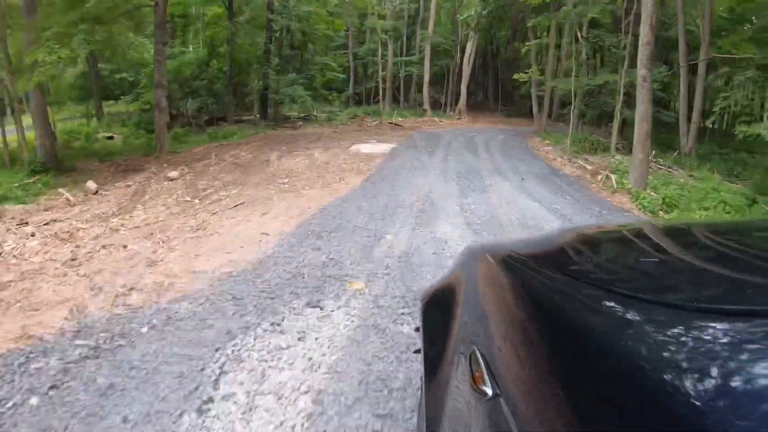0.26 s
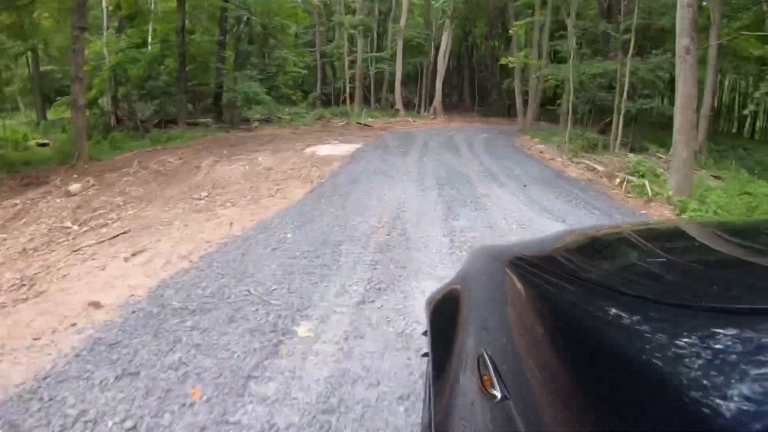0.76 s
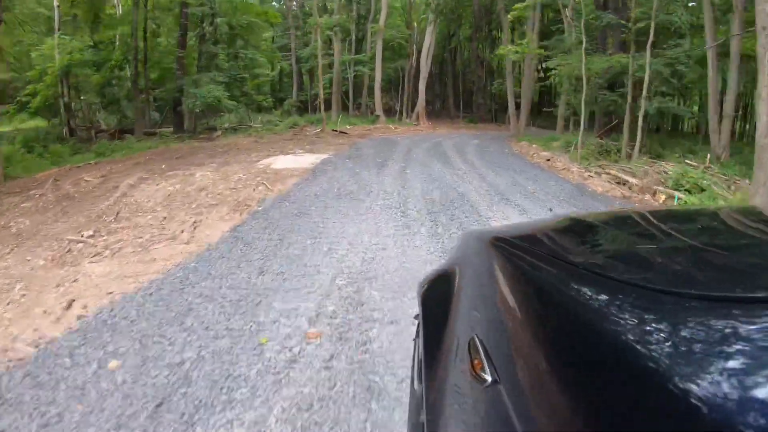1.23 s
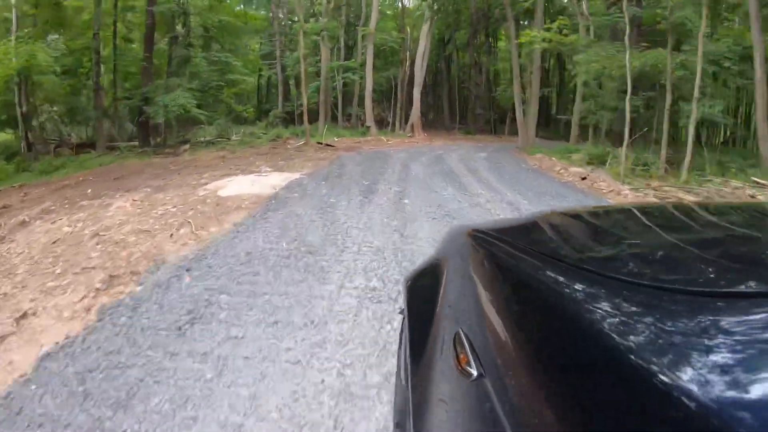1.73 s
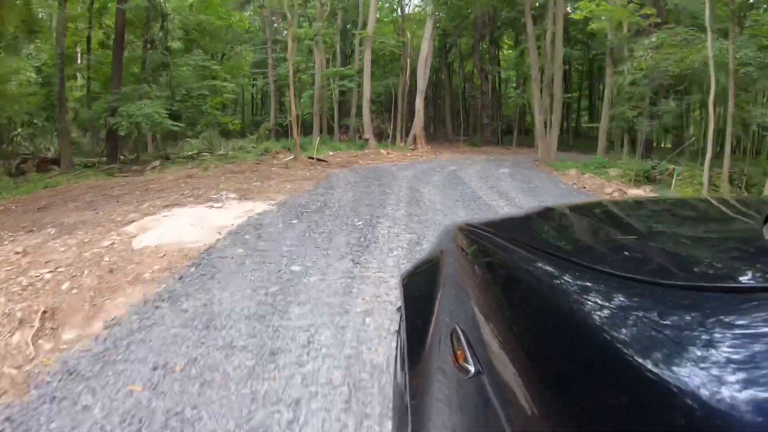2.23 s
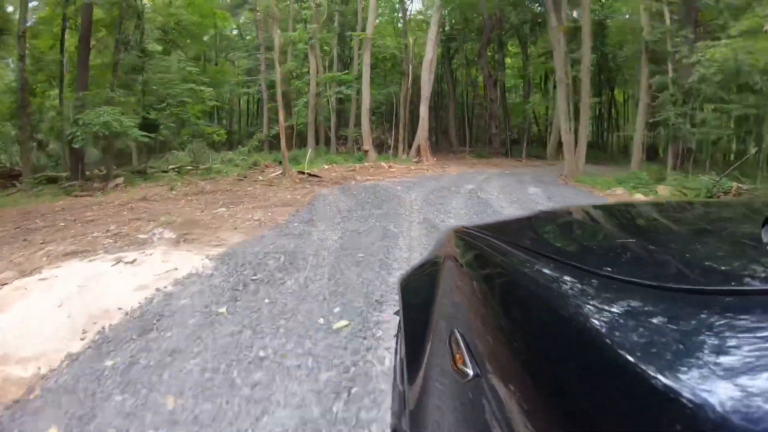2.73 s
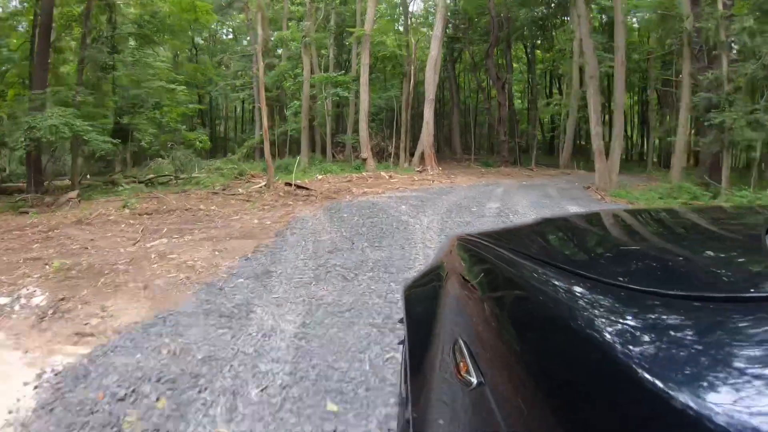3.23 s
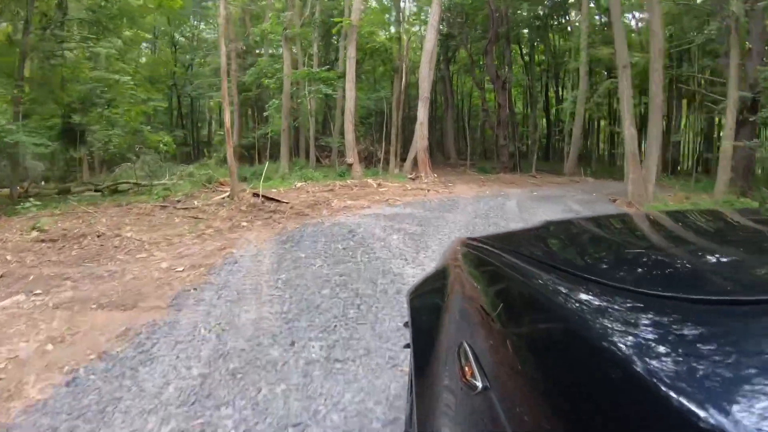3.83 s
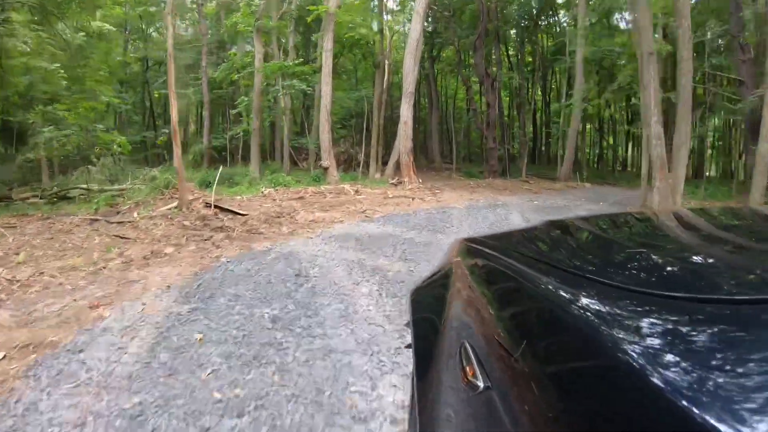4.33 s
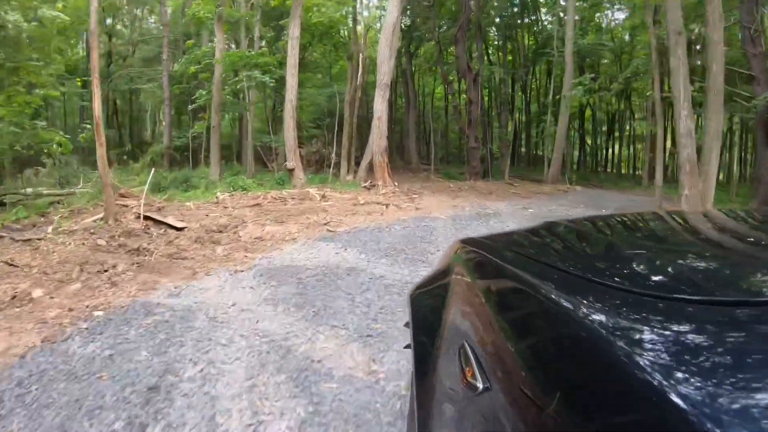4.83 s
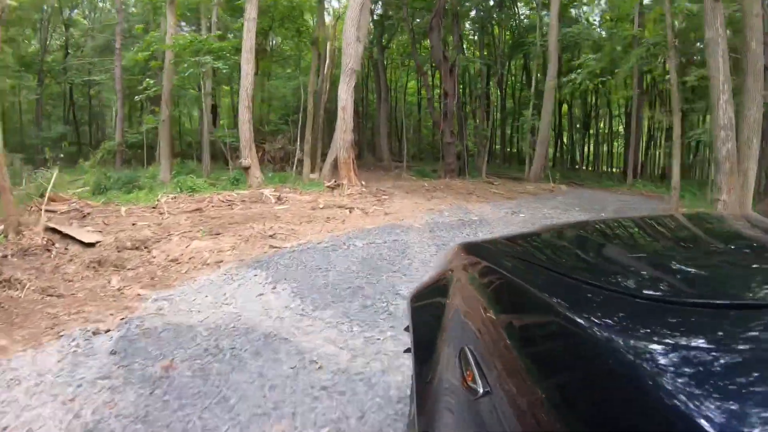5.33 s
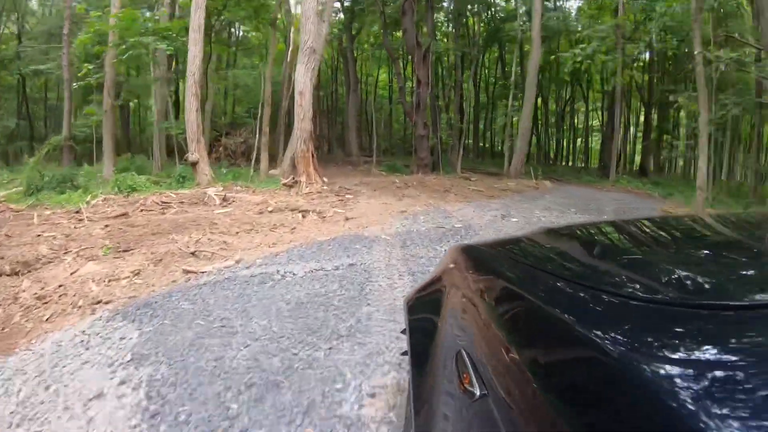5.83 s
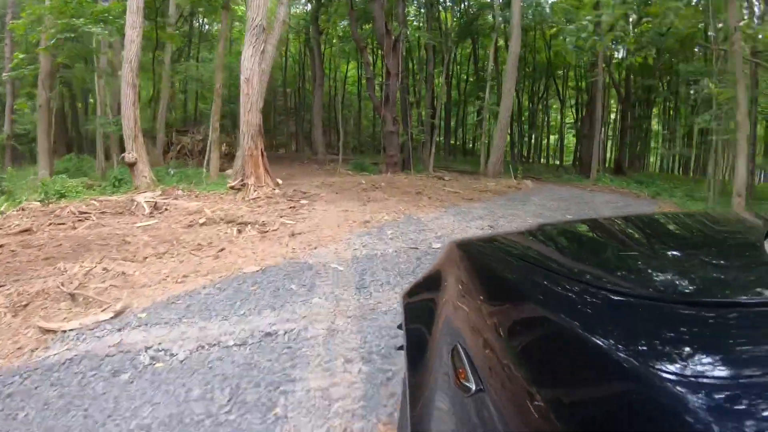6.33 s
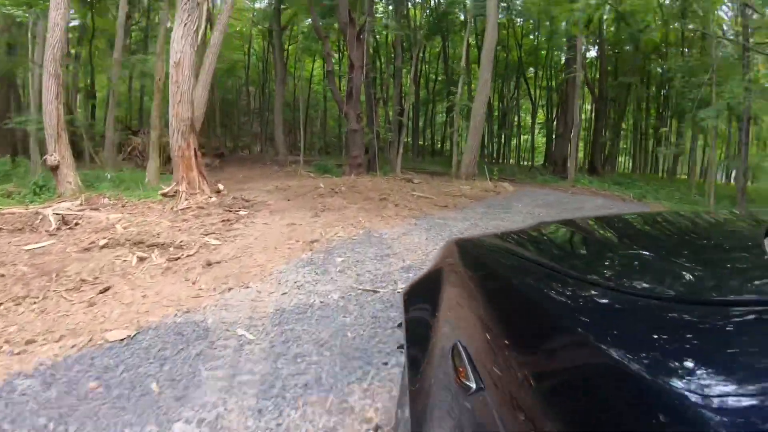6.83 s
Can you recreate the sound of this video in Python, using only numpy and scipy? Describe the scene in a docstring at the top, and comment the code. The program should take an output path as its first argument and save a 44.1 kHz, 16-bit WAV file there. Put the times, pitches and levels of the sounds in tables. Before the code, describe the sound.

A car rolls slowly over loose gravel, tyres crunching and popping stones beneath a low engine hum, with early wind buffeting on the left.

```python
"""Loose gravel under a slowly rolling car tyre: stones grind, pop and fly up into the wheel arch.
The two-port camera microphone is held outside the driver's window, with the tyre to its right.
The engine hums, pulls and eases off; at first the airstream buffets the left port.
Stones are filtered noise bursts, the engine is a sum of cosines, wind and rumble are shaped noise.
"""
import sys
import numpy as np
from scipy import signal
from scipy.fft import rfft, irfft, next_fast_len
from scipy.io import wavfile
from scipy.ndimage import map_coordinates

SR = 44100
rng = np.random.default_rng(int(sys.argv[2]) if len(sys.argv) > 2 else 0)


def master_out(mix):
    """Clip the mix to full scale and print it as 16-bit PCM to the path in sys.argv[1]."""
    frames = np.transpose(np.atleast_2d(mix))
    ceiling = np.clip(frames, -1, 1)
    pcm = np.round(ceiling * 32767).astype(np.int16)
    wavfile.write(sys.argv[1], SR, pcm)


N = 311919  # length in samples

# All levels below stand ahead of each layer's own trim; spectra give only relative levels.

# pull and easing of the engine: time_s, firing_rate_hz
FIRING_RATE = [(0.0, 56.2), (0.3, 60.16), (0.71, 67.1), (1.2, 73.06), (1.69, 76.72), (2.28, 74.45),
               (2.65, 67), (3.05, 62.46), (3.5, 59.7), (3.8, 59.16), (4.05, 60.6), (4.3, 60.18),
               (4.84, 55.7), (5.28, 52.83), (5.72, 51.4), (6.16, 50.14), (6.65, 49.55), (7.07, 47.9)]
# what the exhaust passes of the firing tone and its overtones: pitch_hz, level_db
EXHAUST_RESPONSE = [(48, -27.3), (51, -26.5), (53, -24.3), (57, -20.3), (61, -19), (67, -21.3), (72, -21),
                    (76, -20), (96, -21.5), (100, -23), (105, -25), (118, -30.5), (124, -30.5), (135, -36),
                    (147, -34.5), (160, -36), (185, -39), (208, -40.5), (225, -47), (245, -56), (310, -62)]
# half orders from unequal cylinders: pitch_hz, level_db
HALF_ORDER_RESPONSE = [(25, -45), (30, -38), (38, -45), (74, -32.5), (80, -33), (86, -36.5), (95, -34),
                       (115, -37), (125, -47), (150, -45), (178, -51), (200, -44), (211, -41), (230, -51),
                       (270, -56)]
# overtones are weaker while the engine pulls, until it eases off between two times
OVERTONE_LOAD_DB, EASING_S = -4, (2.3, 3.0)

# roughness of the track: time_s, rumble_db
TRACK_ROUGHNESS = [(0, -31.5), (1.3, -32), (2.2, -27.5), (2.8, -29.5), (3.5, -33), (5, -33.5), (5.7, -31.5),
                   (6.2, -36.5), (7.07, -41.5)]
# rumble spectrum: frequency_hz, level_db_per_hz
RUMBLE_SPECTRUM = [(10, -30), (18, -4), (26, 8), (32, 10.5), (42, 4), (70, -1.5), (110, -2.5), (150, -8),
                   (190, -13.5), (245, -11.5), (350, -17), (800, -60), (3000, -110)]
# ruts crossed by the tyres: centre_s, level_db, length_s
RUT_CROSSINGS = [(.2, -29, 0.27), (.75, -26, 0.37), (1.15, -29, 0.28), (2.42, -26, .18), (2.72, -29, 0.24)]
# boom of the tyres in the ruts: frequency_hz, level_db_per_hz
TYRE_BOOM_SPECTRUM = [(30, -30), (55, -6), (90, 0), (115, -3), (160, -15), (400, -50), (2000, -110)]

# looseness of the coarse stones under the tread: time_s, crunch_db
COARSE_STONES = [(0, -39.5), (.43, -36), (.7, -38.5), (2.1, -39.5), (3.0, -43.5), (3.9, -43.5), (4.5, -39),
                 (5.1, -42), (5.8, -40.5), (6.2, -42.5), (7.07, -41)]
# patches of fine grit on the track: time_s, hiss_db
GRIT_PATCHES = [(0, -54.5), (.25, -53.5), (.4, -48.5), (.7, -54), (.97, -51), (1.25, -54.5), (2.1, -51.5),
                (3.4, -52), (3.72, -48.5), (4.1, -52.5), (4.5, -51), (5.4, -54.5), (7.07, -52.5)]
# spectra of coarse stones and of fine grit: frequency_hz, level_db_per_hz
CRUNCH_SPECTRUM = [(100, -6.5), (200, 9), (320, 3), (470, 0), (640, -5), (760, -4), (900, -7), (1400, -10),
                   (2000, -14.5), (2600, -20), (5000, -27), (12000, -59)]
GRIT_SPECTRUM = [(600, 0.5), (1700, 14), (2500, 1), (3300, 3.5), (4200, -2), (5250, 3), (5900, -0.5),
                 (6750, 4), (7400, -2), (9300, -6), (10500, -17), (12000, -24), (15000, -30)]

# drumming of the wheel well: time_s, level_db
DRUMMING_LEVEL = [(0, -42), (1.5, -37), (2, -31), (3.7, -35), (5.7, -40.5), (6.2, -32.5), (6.6, -39),
                  (7.07, -41)]
# hollow resonances of the wheel well: pitch_hz, width_hz, level_db
WELL_MODES = [(478, 120, -3), (624, 45, 3), (708, 99, -2)]

# airstream, leaving the left port as the car turns: time_s, level_db
AIRSTREAM_LEVEL = [(0, -28.5), (.28, -23.5), (.5, -22), (.78, -22.5), (1.0, -24), (1.15, -24.5),
                   (1.22, -33), (1.6, -25), (2.05, -34.5), (2.5, -31.5), (3, -41.5), (7.07, -68)]
# strongest puffs: centre_s, level_db, length_s
STRONG_PUFFS = [(.06, -13.5, .085), (.235, -15, .08), (.86, -21, .05), (1.13, -17.5, .06),
                (1.418, -27, .05), (1.597, -17.5, .04), (1.933, -22, .025), (2.033, -21, .025),
                (2.456, -22, .038)]
# buffeting spectrum: frequency_hz, level_db_per_hz
BUFFET_SPECTRUM = [(20, -18), (70, -2), (130, 3), (195, 4.5), (300, -1), (450, -4.5), (700, -8),
                   (1100, -19), (2000, -35), (5000, -57)]
# what the sheltered right port gets of the left port's wind: frequency_hz, level_db
LEE_RESPONSE = [(100, -24), (250, -14), (400, -10), (600, -6), (900, -2), (1300, 2), (2500, 2)]
LEE_PHASE_RAD = 2.7
PUFFS_PER_S, PUFF_DB = 10, 0.5  # pace and depth of the airstream's lesser puffs

# larger stones popping out from under the tread: start_s, level_db, rattle_t60_s, pitch_hz
LARGE_POPS = [(.247, -24, .05, 1500), (.266, -19, .035, 1000), (.305, -23, .03, 850),
              (.34, -19.5, .045, 1500), (.465, -18.5, .04, 750), (.518, -22.5, .03, 650),
              (.571, -21.5, .03, 650), (.701, -16.5, .04, 1050), (.82, -22, .037, 1200),
              (.87, -24, .03, 650), (.915, -24, .03, 700), (1.122, -22, .03, 620), (1.26, -20, .045, 1100),
              (1.568, -22.5, .03, 900), (1.69, -22, .035, 1300), (1.837, -22.5, .03, 750),
              (1.917, -22, .022, 650), (1.983, -17, .03, 624), (1.998, -19, .021, 600),
              (2.01, -15.5, .035, 756), (2.069, -20.5, .022, 640), (2.121, -16.5, .028, 900),
              (2.229, -24, .03, 800), (2.29, -24.5, .03, 580), (2.337, -19, .03, 1300),
              (2.351, -23, .03, 550), (2.38, -19.5, .035, 500), (2.581, -20.5, .033, 500),
              (2.662, -22, .05, 1250), (2.734, -17.5, .04, 1050), (2.759, -23, .025, 600),
              (2.918, -24, .03, 600), (3.015, -22, .024, 553), (3.205, -19.5, .024, 800),
              (3.285, -23, .025, 600), (3.354, -23, .03, 750), (3.526, -22.5, .035, 1000),
              (3.639, -19, .035, 700), (3.801, -24, .03, 1000), (4.022, -22.5, .03, 800),
              (4.313, -22, .045, 1200), (4.429, -19, .032, 1150), (4.501, -23, .03, 650),
              (4.556, -22, .07, 1150), (4.653, -19, .045, 850), (4.693, -20.5, .03, 950),
              (4.893, -23.5, .034, 750), (5.028, -20.5, .032, 1100), (5.075, -24.5, .03, 650),
              (5.12, -25, .045, 1400), (5.332, -25, .027, 650), (5.478, -22.5, .035, 850),
              (6.084, -20, .05, 906), (6.179, -17, .025, 720), (6.1995, -8.5, .028, 860),
              (6.266, -16.5, .024, 780), (6.364, -23, .05, 1150), (6.405, -25, .03, 650),
              (6.477, -21, .028, 1000), (6.508, -22, .04, 1400), (6.723, -23.5, .03, 900),
              (6.912, -20, .03, 950), (6.918, -15.5, .045, 680), (6.959, -24.5, .025, 1500),
              (6.995, -23, .025, 1450)]
# pop spectrum: frequency_hz, level_db_per_hz
POP_SPECTRUM = [(120, -5), (300, -7), (500, -2), (720, 2), (950, -2), (1350, -4), (2000, -8), (4000, -19),
                (8000, -22), (12000, -39)]
# brief ring of the tyre when a stone pops: pitch_hz, width_hz, level_db
TYRE_RING = [(624, 110, 1.5)]
# lesser stones pop at random
SMALL_POPS_PER_S, SMALL_POP_DB, SMALL_POP_SPREAD_DB, SMALL_POP_T60_S = 10, -31, 1.5, 0.02
SMALL_POP_HZ, SMALL_POP_OCTAVES = 1070, 0.48  # middle pitch and its spread
# a larger stone jostles its neighbours: range of delays, level relative to it
JOSTLE_S, JOSTLE_DB = (.008, .03), -12

# stones flung against the wheel arch, with ricochets: start_s, level_db, rattle_t60_s, brightest_hz
ARCH_STRIKES = [(.408, -19, 0.06, 2500), (.413, -21.5, 0.078, 7000), (0.421, -29, 0.057, 1500),
                (0.4232, -23.5, 0.047, 1720), (0.43, -29, 0.035, 1100), (.436, -32, 0.055, 1400),
                (.458, -33.5, 0.16, 5000), (.593, -15.5, 0.036, 4300), (.596, -21, 0.045, 2050),
                (0.6044, -30, 0.052, 3500), (.612, -29.5, 0.037, 2200), (0.935, -35, 0.072, 5476),
                (.976, -34, 0.019, 7000), (0.999, -29, 0.028, 6500), (1.009, -27, 0.014, 8000),
                (1.016, -23.5, 0.027, 8000), (1.04, -29, 0.021, 7000), (1.569, -22, 0.017, 2840),
                (1.599, -32, .04, 1700), (1.643, -17, 0.0051, 5500), (1.703, -34, 0.14, 2380),
                (2.01, -34.5, 0.035, 2500), (2.065, -32.5, 0.021, 2000), (2.076, -26, 0.014, 6000),
                (2.122, -35, .03, 2100), (2.866, -31.5, .02, 7000), (2.889, -34, .04, 6000),
                (3.113, -29, .015, 4000), (3.327, -37, 0.18, 5030), (4.539, -30, 0.059, 5515),
                (4.59, -29.5, 0.029, 3570), (6.913, -36.5, 0.064, 3500)]
# strike spectrum: frequency_hz, level_db_per_hz
ARCH_SPECTRUM = [(300, 1.5), (700, 13), (1200, 10), (3300, -0.5), (4000, -2.5), (5200, -0.5), (5800, 1),
                 (6900, -1.5), (8200, -7.5), (10000, -12.5), (11500, -25)]
# ring of the struck wheel arch: pitch_hz, width_hz, level_db
ARCH_RING = [(1370, 21, -4), (1887, 41, 5.5), (2400, 72, -2), (2830, 44, -0.5), (3030, 70, -0.5),
             (3520, 100, 1), (4080, 110, 1), (5170, 77, 2.5), (5270, 76, -3), (6820, 130, 5.5)]
# small chips tick against the wheel arch at random
CHIPS_PER_S, CHIP_DB, CHIP_SPREAD_DB, CHIP_T60_S, CHIP_HZ = 2.1, -55, 6, 0.0061, 3000

# larger stones taken by the suspension: start_s, level_db
SUSPENSION_BUMPS = [(4.298, 0), (4.557, -6), (4.925, -11), (5.925, -8.5), (6.909, -5.5)]
BUMP_HZ = 201.6  # lower mode of the suspension

# left port, facing away from the tyre, against the right port: frequency_hz, level_db
LEFT_SHADE = [(100, 0), (330, 0), (600, -2.5), (1050, -6), (1860, -11), (3300, -7), (5800, -6), (8000, -3),
              (10000, 0)]
# likeness of the two ports: frequency_hz, likeness_0_to_1
PORT_LIKENESS = [(100, .95), (400, .85), (1100, .62), (2400, .58), (3600, .75), (6900, .63), (8000, .33),
                 (11000, .2)]
# phase by which the left port leads: frequency_hz, lead_rad
LEFT_LEAD = [(100, 0), (600, -.5), (1050, -.7), (2300, .5), (4100, 0), (5000, -1.5), (8800, -1.4),
             (10500, -3)]
TOP_HZ = 10900  # half-power band limit of the camera


def amp(db):
    """Decibels to gain."""
    return 10 ** (np.asarray(db) / 20)


def unit(x):
    """Scale to rms 1."""
    return x / np.sqrt(np.mean(x ** 2) + 1e-20)


def along(points, hz):
    """Read (Hz, value) points on a log axis."""
    f, v = np.transpose(points)
    return np.interp(np.log(hz + 1), np.log(f + 1), v)


def curves(rows):
    """One value per sample for each column after the time."""
    s, *cols = np.transpose(rows)
    return [np.interp(np.arange(N) / SR, s, c) for c in cols]


def wobble(rate):
    """A smooth random curve with rate knots a second."""
    knots = rng.standard_normal(int(N * rate / SR) + 4)
    return map_coordinates(knots, [np.arange(N) * rate / SR])


def swells(rows):
    """Power over time of bell-shaped swells; length is the full width at half power."""
    t = np.arange(N) / SR
    return sum(amp(db) ** 2 * .5 ** ((2 * (t - s) / length) ** 2) for s, db, length in rows)


def at_random(rate, db, spread_db):
    """Rows (start_s, level_db) of chance events, rate a second."""
    own = np.random.default_rng(rng.integers(2 ** 31))
    count = round(rate * N / SR)
    return [(own.uniform(0, N / SR), own.normal(db, abs(spread_db))) for _ in range(count)]


def add(track, s, sound):
    """Mix a sound into a track at time s."""
    room = track[..., max(round(s * SR), 0):][..., :sound.shape[-1]]
    room += sound[..., :room.shape[-1]]


def filtered(x, response):
    """Filter x by a complex response of frequency."""
    m = 2 * next_fast_len(N // 2 + 8192)
    return irfft(rfft(x, m) * response(np.fft.rfftfreq(m, 1 / SR)), m)[..., :N]


def coloured(x, spectrum):
    """Causal minimum-phase filter with this spectrum; white noise keeps its power."""
    def response(hz):
        cepstrum = irfft(np.log(unit(amp(along(spectrum, hz)))))
        # fold the cepstrum forward in time
        half = len(cepstrum) // 2
        cepstrum[1:half] *= 2
        cepstrum[half + 1:] = 0
        return np.exp(rfft(cepstrum))
    return filtered(x, response)


def clack(t60, hz, sharpness, firmness=0.56, chatter_db=2):
    """One stone contact in two channels: a crack, then a chattering decay, strongest near hz."""
    t = np.arange(SR // 6) / SR
    decay_db = -60 * t / t60
    chatter = np.interp(t, np.linspace(0, t[-1], num=60), rng.standard_normal(size=60))
    chatter *= 1 - amp(decay_db)  # the first blow is firm, the rebounds are uneven
    scatter = rng.standard_normal((2, len(t))) * amp(chatter_db * chatter + decay_db)
    scatter[1, 0] = firmness * np.linalg.norm(scatter[1])  # the crack, on the tyre's side
    b, a = signal.iirpeak(min(hz, SR / 5), max(sharpness, .5), SR)
    return signal.lfilter(b, a, scatter) * np.sqrt(SR / hz) / 2


def stones(rate, spread_db, t60, low_hz, high_hz, sharpness, patchy_db, count=14):
    """A stream of contacts, many small and few large; each pitch of stone comes and goes in patches."""
    stream = np.zeros((2, N))
    for hz in np.geomspace(low_hz, high_hz, count):
        own = np.random.default_rng(rng.integers(2 ** 31))
        when, rank, sign = own.random((int(rate * N / SR / count), 3)).T
        size = amp(spread_db * np.minimum(-np.log(1 - rank), 4))
        patches = amp(patchy_db * np.clip(wobble(16), -1.5, 1.5))
        blows = np.bincount((when * N).astype(int), size * np.sign(sign - .5), N) * patches
        sound = unit(clack(t60 * 2 ** rng.uniform(-1.37, 1), hz, sharpness))
        stream += signal.oaconvolve(blows[None], sound, axes=1)[:, :N]
    return unit(stream)


def ringing(modes, vary_db, detune):
    """A body's answer to one blow: the blow and decaying modes that vary with the spot struck."""
    t = np.arange(SR // 8) / SR
    answer = np.zeros(len(t))
    for hz, width, db in modes:
        louder, higher = rng.standard_normal(2)
        decay = 2 * np.pi * width / SR * np.exp(-np.pi * width * t)
        tone = np.cos(2 * np.pi * hz * (1 + detune * higher) * t)
        answer += amp(db + vary_db * louder) * decay * tone
    answer[0] += 1
    return answer


def gravel(crunch_gain_db=2, grit_gain_db=4, crunch_clump_db=0.9, grit_clump_db=1, shared_db=0.5):
    """Coarse stones grind under the tread and fine grit crackles; both give way in clumps."""
    grit_db, = curves(GRIT_PATCHES)
    crunch_db, = curves(COARSE_STONES)
    give, coarse_clumps, fine_clumps = wobble(30), wobble(40), wobble(28)
    coarse = stones(rate=900, spread_db=1.0, t60=0.031, low_hz=447, high_hz=3360,
                    sharpness=0.65, patchy_db=2.5)
    fine = stones(rate=2000, spread_db=2.5, t60=0.047, low_hz=2300, high_hz=8650,
                  sharpness=1.6, patchy_db=2.5)
    crunch_db = crunch_db + crunch_gain_db + shared_db * give + crunch_clump_db * coarse_clumps
    grit_db = grit_db + grit_gain_db + shared_db * give + grit_clump_db * fine_clumps
    crunch = coloured(coarse, CRUNCH_SPECTRUM) * amp(crunch_db)
    grit = coloured(fine, GRIT_SPECTRUM) * amp(grit_db)
    return crunch + grit


def drumming(level_db=-1.0):
    """Stones working against the tyre keep the hollow wheel well ringing."""
    drum_db, = curves(DRUMMING_LEVEL)
    knocks = stones(rate=900, spread_db=2.5, t60=.004, low_hz=500, high_hz=800,
                    sharpness=.6, patchy_db=2, count=8)

    def well(f):
        total = 0
        for k, (hz, width, db) in enumerate(WELL_MODES):
            resonance = 1j * f * width / (hz * hz - f * f + 1j * f * width)
            total = total + (-1) ** k * amp(db) * resonance  # neighbouring modes alternate in sign
        return total

    rings = np.array([unit(ring) for ring in filtered(knocks, well)])
    return amp(drum_db + level_db) * rings


def engine():
    """The muffled exhaust: firing tone, overtones and half orders swell as they slide past resonances."""
    firing_hz, = curves(FIRING_RATE)
    phase = 2 * np.pi * np.cumsum(firing_hz * (1 + 0.00098 * wobble(16))) / SR
    load_db = np.interp(np.arange(N) / SR, EASING_S, [OVERTONE_LOAD_DB, 0])
    hum = np.zeros(N)
    for multiple in range(1, 5):
        db = along(EXHAUST_RESPONSE, multiple * firing_hz) + load_db * (multiple > 1) + .35 * wobble(5)
        hum += amp(db) * np.cos(multiple * phase)
        half = multiple - .5
        half_db = along(HALF_ORDER_RESPONSE, half * firing_hz) + wobble(3)
        hum += amp(half_db) * np.cos(half * phase + 2 * np.pi * rng.random())
    return np.sqrt(2) * hum * amp([[-.3], [.3]])  # a touch louder on the right


def rumble(level_db=5.5, swell_db=2.5):
    """The uneven track shakes the body, nearly alike on both sides; tyres boom as they cross ruts."""
    road_db, = curves(TRACK_ROUGHNESS)
    shake_gain = amp(road_db + level_db + swell_db * wobble(2.42))
    shake = shake_gain * coloured(rng.standard_normal((2, N)), RUMBLE_SPECTRUM)
    boom = np.sqrt(swells(RUT_CROSSINGS)) * coloured(rng.standard_normal((2, N)), TYRE_BOOM_SPECTRUM)
    mid, side = (shake + boom) * amp([[0], [-4.5]])
    return np.array([mid + side, mid - side])


def wind(right_db=-20, lee_db=0):
    """Eddies puff over the left port; the sheltered right gets them nearly inverted, with weak lows."""
    air_db, = curves(AIRSTREAM_LEVEL)
    power = amp(air_db + PUFF_DB * wobble(PUFFS_PER_S)) ** 2 + swells(STRONG_PUFFS)
    eddies = unit(rng.standard_normal((2, N)) * amp(2.4 * wobble(150)))
    left, own = np.sqrt(power) * coloured(eddies, BUFFET_SPECTRUM)

    def shelter(hz):
        return amp(lee_db + along(LEE_RESPONSE, hz)) * np.exp(1j * LEE_PHASE_RAD)

    lee = filtered(left, shelter)
    return np.array([left, lee + amp(right_db) * own])


def pops(level_db=-12.8, sharpness=1.0):
    """Stones squeezed out by the tyre knock, rattle, ring it and jostle their neighbours."""
    track = np.zeros((2, N))
    lesser = at_random(SMALL_POPS_PER_S, SMALL_POP_DB, SMALL_POP_SPREAD_DB)
    jostle_delays = rng.uniform(*JOSTLE_S, (len(LARGE_POPS), 2))  # two neighbours each
    for (s, db, _, _), delays in zip(LARGE_POPS, jostle_delays):
        lesser += [(s + delay, db + JOSTLE_DB) for delay in delays]
    small = []
    for s, db in lesser:
        pitch_hz = SMALL_POP_HZ * 2 ** (SMALL_POP_OCTAVES * rng.standard_normal())
        small.append((s, db, SMALL_POP_T60_S, pitch_hz))
    for s, db, t60, hz in LARGE_POPS + small:
        knock = amp(db + level_db) * clack(t60, hz, sharpness, firmness=0.46)
        tyre = ringing(TYRE_RING, vary_db=1.5, detune=.1)
        add(track, s, signal.fftconvolve(knock, tyre[None], axes=1))
    return coloured(track, POP_SPECTRUM)


def strikes(level_db=-2, sharpness=1.0):
    """Flung stones crack against the wheel arch, ring it and ricochet; small chips tick at random."""
    track = np.zeros((2, N))
    ticks = at_random(CHIPS_PER_S, CHIP_DB, CHIP_SPREAD_DB)
    chips = [(s, db, CHIP_T60_S, CHIP_HZ) for s, db in ticks]
    for s, db, t60, hz in ARCH_STRIKES + chips:
        blow = amp(db + level_db) * clack(t60, hz, sharpness, firmness=0.5, chatter_db=4)
        arch = ringing(ARCH_RING, vary_db=-2.0, detune=.015)
        add(track, s, signal.fftconvolve(blow, arch[None], axes=1))
    return coloured(track, ARCH_SPECTRUM)


def bumps(t60=0.037, rise=0.017, upper=1.53, upper_db=-5, left_db=-7):
    """After a larger stone the suspension swings briefly in two low modes, louder on the right."""
    track, t = np.zeros(N), np.arange(SR // 4) / SR
    lower_mode = np.sin(2 * np.pi * BUMP_HZ * t)
    upper_mode = amp(upper_db) * np.sin(2 * np.pi * upper * BUMP_HZ * t)
    swing = (1 - np.exp(-t / rise)) * (lower_mode + upper_mode)
    for s, db in SUSPENSION_BUMPS:
        add(track, s, 2 * amp(db - 60 * t / t60) * swing)
    return np.array([amp(left_db) * track, track])


def from_tyre(pair):
    """Place tyre sounds to the right: the left port is shaded, phase-shifted and only partly alike."""
    def to_left(hz):
        alike = np.clip(along(PORT_LIKENESS, hz), 0, 1)
        shade = amp(along(LEFT_SHADE, hz)) * np.exp(1j * along(LEFT_LEAD, hz))
        return shade * np.array([np.sqrt(1 - alike ** 2), alike])

    left = filtered(pair, to_left).sum(0)
    return np.array([left, pair[1]])


def scene():
    """Tyre sounds and bumps stronger on the right, engine and rumble all round, wind on the ports."""
    tyre = from_tyre(gravel() + drumming() + pops() + strikes())
    return tyre + bumps() + engine() + rumble() + wind()


def record(dry):
    """The camera rounds off the highest peaks and cuts steeply above its limit."""
    rounded = dry / (1 + (dry / .65) ** 6) ** (1 / 6)
    rounded *= np.minimum(np.arange(N) / SR / .002, 1)  # a 2 ms fade-in keeps the start free of a click
    return filtered(rounded, lambda hz: 1 / np.sqrt(1 + (hz / TOP_HZ) ** 22))


dry = scene()
out = record(dry)
master_out(out)
```